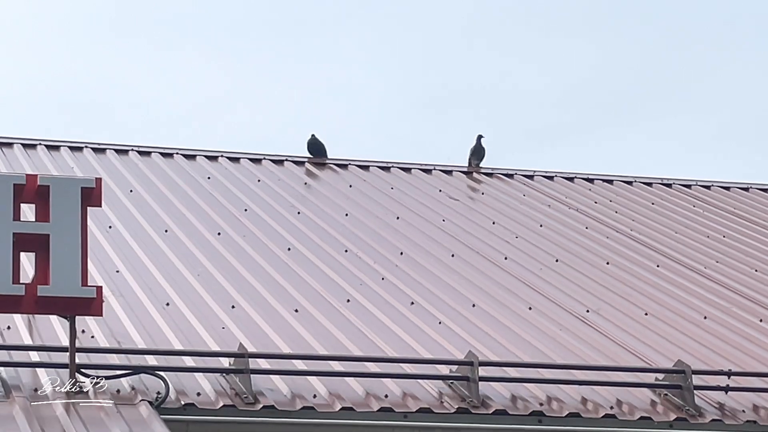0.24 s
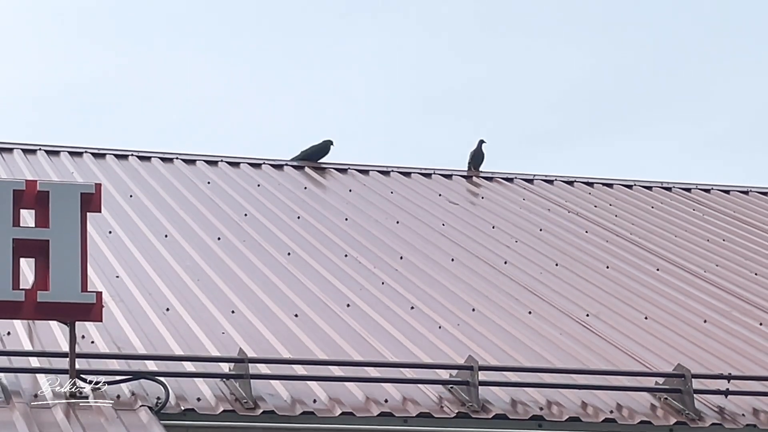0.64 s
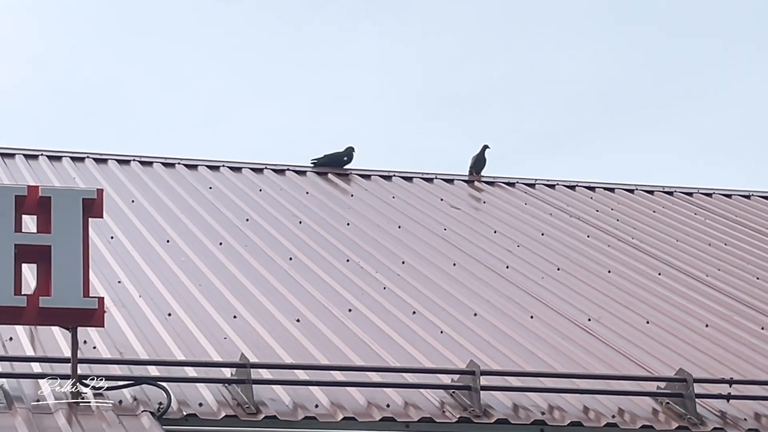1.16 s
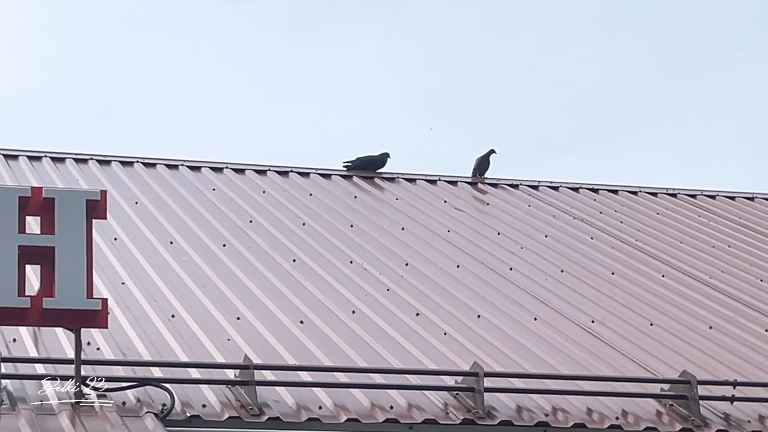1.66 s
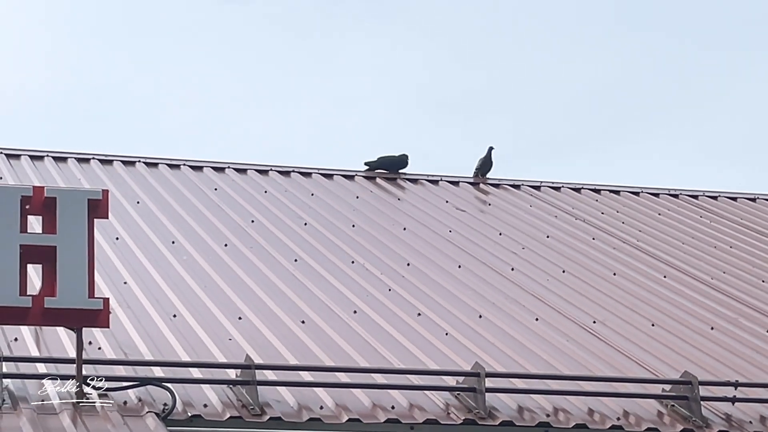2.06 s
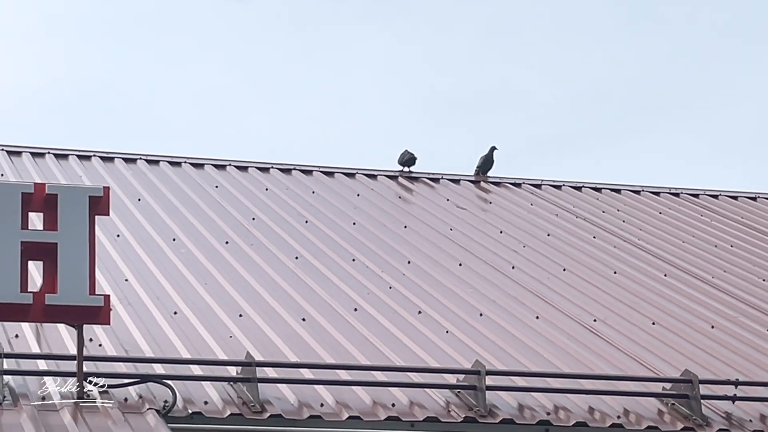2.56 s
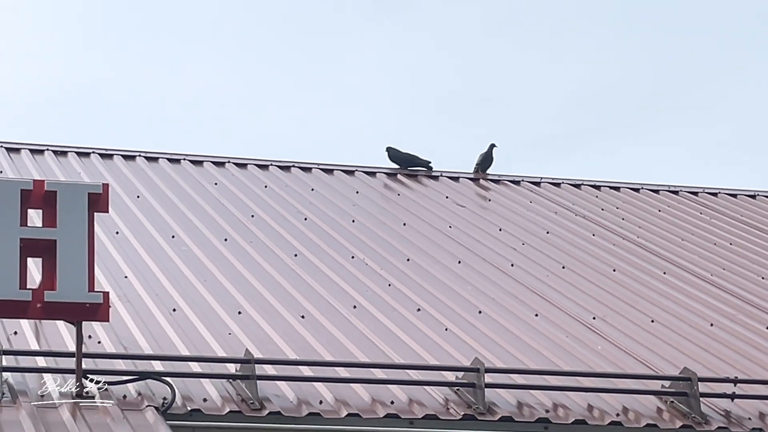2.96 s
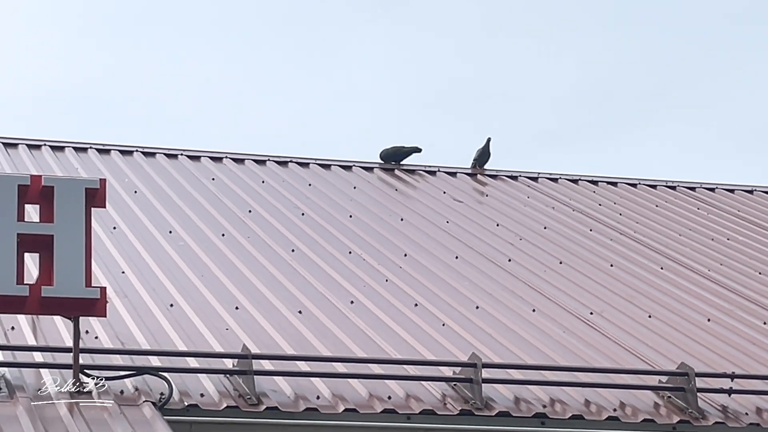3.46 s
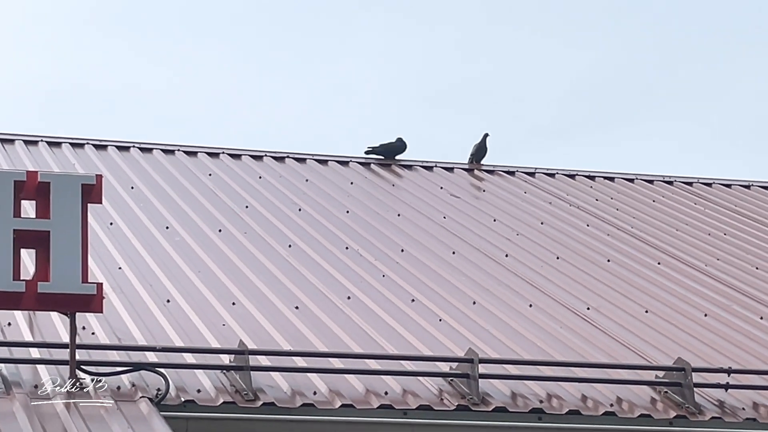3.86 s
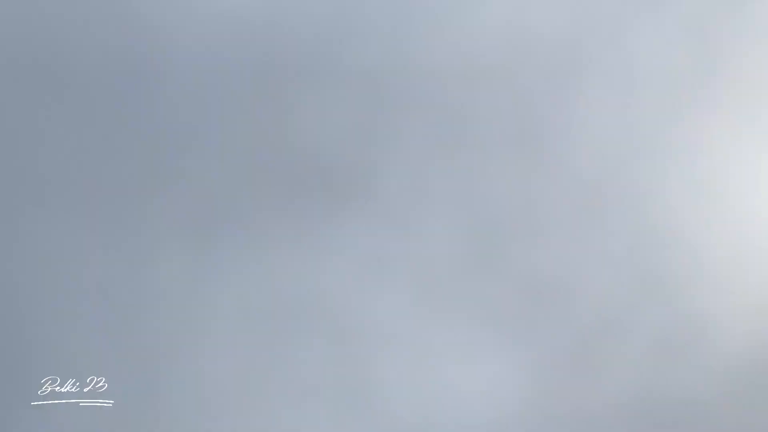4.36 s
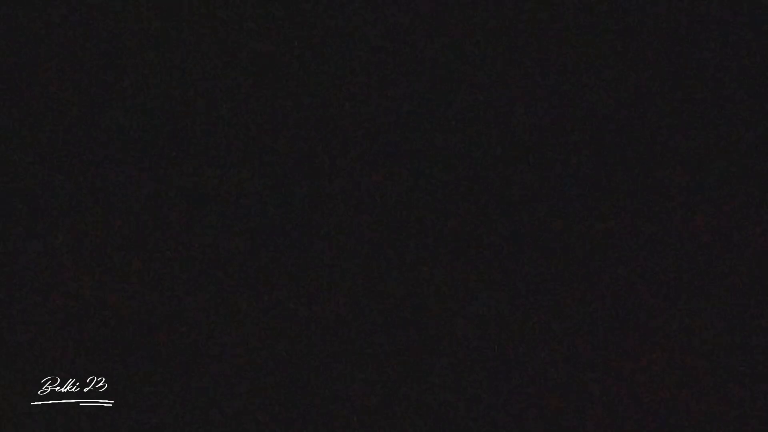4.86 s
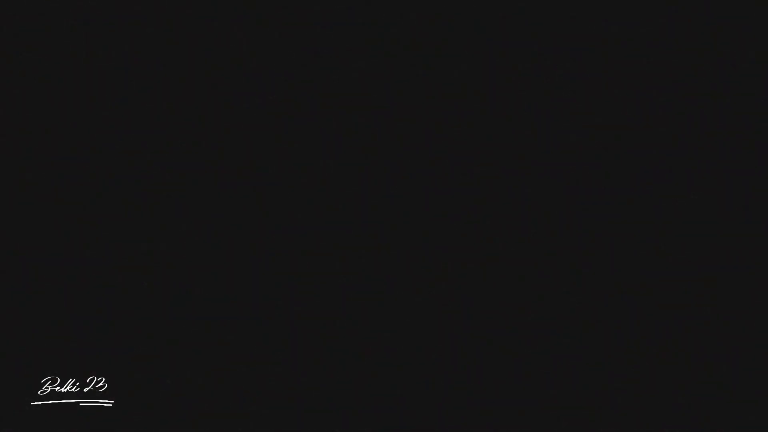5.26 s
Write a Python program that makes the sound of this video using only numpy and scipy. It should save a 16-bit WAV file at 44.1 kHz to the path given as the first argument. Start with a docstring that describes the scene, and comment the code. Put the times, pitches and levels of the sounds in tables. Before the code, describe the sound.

Outdoors, with low rumble and faint hiss, a pigeon on a metal roof gives three phrases of fast low clucks, each sinking into a coo and a thin husky moan. Light claw scratches tick along. After a tiny dropout near the end, a hand covers the microphone: very loud knocks, clicks, a scratchy squeak and rubbing, then duller, muffled handling.

```python
"""A courting pigeon on the ridge of a metal roof, a little left of the microphone: three phrases of soft
stuttered clucks, each ending in a coo and a thin moan, all gliding tones answered weakly by the yard.
Shaped noise gives its claws on the sheet, dry rasps and the quiet outdoor rumble and hiss; a far whistle is faint.
The sound drops out for a moment; then a hand closes over the camera, right at the microphone:
filtered blows make its knocks, friction noise its rubbing, and gliding husky tones its squeaks."""
import sys
import numpy as np
from scipy import signal
from scipy.fft import rfft, irfft, next_fast_len
from scipy.io import wavfile
from scipy.ndimage import map_coordinates

SR = 44100
rng = np.random.default_rng(int(sys.argv[2]) if len(sys.argv) > 2 else 0)


def wav_out(sig):
    """Save sig, one row per channel (or a flat mono array), as 16-bit PCM at SR to the path in sys.argv[1]."""
    wavfile.write(sys.argv[1], SR, np.round(np.clip(np.atleast_2d(sig).T, -1, 1) * 32767).astype(np.int16))


N = 243417
T = np.arange(N) / SR  # time of each sample [s]


def amp(db):
    """Decibels to gain."""
    return 10 ** (np.asarray(db) / 20)


def unit(x):
    """Scale to rms 1."""
    return x / np.sqrt(np.mean(x ** 2) + 1e-20)


def gain(points, hz):
    """Gain of (frequency [Hz], level [dB]) points joined on a log frequency axis."""
    f, db = np.transpose(points)
    return amp(np.interp(np.log(hz + 1), np.log(f), db))


def curves(rows):
    """One value per sample for each column after the time."""
    s, *columns = np.transpose(rows)
    return [np.interp(T, s, column) for column in columns]


def during(rows):
    """A soft-edged gate over the time that a table covers."""
    inside = np.minimum(T - rows[0][0], rows[-1][0] - T)
    return np.clip(inside / 0.0037, 0, 1)


def swells(rows):
    """Bell-shaped rises and falls of level."""
    return sum(amp(db) * np.exp(-((T - s) / half) ** 2) for s, half, db in rows)


def wobble(rate):
    """A smooth random curve, rate knots a second."""
    knots = rng.standard_normal(int(N * rate / SR) + 4)
    return map_coordinates(knots, [T * rate])


def filtered(x, response):
    """x times a complex response of frequency."""
    m = next_fast_len(N + SR // 2)
    return irfft(rfft(x, m) * response(np.fft.rfftfreq(m, 1 / SR)), m)[..., :N]


def noise(tone):
    """Coloured noise of rms 1."""
    return unit(filtered(rng.standard_normal(N), lambda hz: gain(tone, hz)))


def cycles(hz):
    """Running phase [rad] of a pitch curve."""
    return 2 * np.pi * np.cumsum(hz) / SR


def narrow(phase, width_hz):
    """A fuzzy line of rms about 1 around a running phase."""
    return wobble(width_hz) * np.sin(phase) + wobble(width_hz) * np.cos(phase)


def husky(hz, husk, husk_hz):
    """A gliding tone, part pitch and part rush."""
    phase = cycles(hz * (1 + .015 * wobble(40)))
    return np.sin(phase) + husk * narrow(phase, husk_hz)


# Stuttered notes before each coo: (time [s], level before trim [dB], pitch it sags towards [Hz])
CLUCK_NOTES = [(.062, -49.5, 308), (.12, -46, 341), (.183, -45.5, 330), (.243, -50.5, 291),
               (.368, -51.5, 430), (1.82, -59.5, 400), (1.955, -61, 400), (2.005, -55.5, 301),
               (2.062, -55, 334), (2.122, -57, 311), (2.185, -67, 448), (2.245, -60, 306),
               (2.285, -58.5, 318), (3.245, -54.5, 410), (3.38, -52.5, 303), (3.438, -50.5, 332),
               (3.5, -49, 341), (3.56, -50, 316), (3.633, -53, 383), (3.708, -51, 328)]


def clucks(length_s=0.021, fall=0.565, fall_s=0.0053, octave_db=-3.0, rough=0.57, trim_db=-1.2):
    """The syrinx starts each short, slightly hoarse puff high, and its pitch sags at once."""
    out, t = np.zeros(N), np.arange(int(length_s * SR)) / SR
    swell = np.abs(np.sin(np.pi * t / length_s)) ** 0.62
    shake = 1 + rough * wobble(350)
    for s, db, hz in CLUCK_NOTES:
        phase = cycles(hz * (1 + fall * np.exp(-t / fall_s)))
        octave = amp(octave_db + rng.normal(0, 1.2)) * np.sin(2 * phase)
        out[round(s * SR):][:len(t)] += amp(db) * swell * (np.sin(phase) + octave)
    return amp(trim_db) * out * shake


# Glide of each coo, one list per coo: (time [s], pitch [Hz], level before the crop [dB])
COO_GLIDES = [
    [(.408, 480, -53.5), (.44, 436, -53.5), (.46, 349.6, -52.5), (.53, 350, -49), (.556, 310, -52.5),
     (.585, 304, -58), (.615, 199, -69)],
    [(2.28, 355, -66), (2.32, 380, -61.5), (2.41, 335, -62), (2.46, 275, -64.5), (2.545, 224, -58),
     (2.59, 208, -67)],
    [(3.735, 315, -56), (3.78, 320, -53), (3.82, 342, -56.5), (3.89, 274, -61.5), (3.95, 250, -59.5),
     (3.972, 208, -59.5), (4, 154, -63.5)],
]
# How gravelly each coo is: (roughness at its start [0-1], at its end [0-1])
COO_ROUGHNESS = [(0.22, 0.034), (1, 0.46), (0.92, 0.37)]
# Under this pitch the octave takes over from the fundamental; the steepness is an exponent
OCTAVE_BELOW_HZ, OCTAVE_STEEPNESS = 281, 8.1


def coos(flutter_hz=260, jitter=0.00755):
    """A tone that clears of gravel as it goes; as it sinks, the crop's resonance favours the octave."""
    out = np.zeros(N)
    for rows, roughness in zip(COO_GLIDES, COO_ROUGHNESS):
        hz, db = curves(rows)
        rough = np.clip(np.interp(T, [rows[0][0], rows[-1][0]], roughness), 0, 1)
        octave = (OCTAVE_BELOW_HZ / hz) ** OCTAVE_STEEPNESS
        phase = cycles(hz * (1 + jitter * wobble(60)))
        level = during(rows) * amp(db)
        for k, share in enumerate([1, octave], 1):
            clean = np.sqrt(2 * (1 - rough ** 2)) * np.sin(k * phase)
            gravel = rough * narrow(k * phase, flutter_hz)
            out += level * share / np.hypot(1, octave) * (clean + gravel)
    return out


# Thin, husky moan after each coo, one list per moan: (time [s], pitch [Hz], level before trim [dB])
MOAN_GLIDES = [
    [(.64, 607, -72), (.7, 661, -66.5), (.8, 638, -72), (.9, 644, -78.5)],
    [(2.61, 540, -65), (2.66, 571, -63.5), (2.74, 650, -66), (2.82, 685, -67), (2.89, 690, -75)],
    [(4.02, 458, -73), (4.1, 539, -62), (4.16, 549, -63.5), (4.24, 600, -62.5), (4.28, 778, -59.5),
     (4.31, 870, -69)],
]


def moans(trim_db=-6.5):
    """The weak, mostly rising tone after each coo, more husk than pitch."""
    out = np.zeros(N)
    for rows in MOAN_GLIDES:
        hz, db = curves(rows)
        out += during(rows) * amp(db + trim_db) * husky(hz, husk=1.6, husk_hz=300)
    return out


# Resonance of the pigeon's inflated crop: (frequency [Hz], level [dB])
CROP_TONE = [(150, -23.5), (300, -2), (580, 1.5), (750, -19.5), (1100, -19)]


def pigeon_voice():
    """Clucks and coos sound through the inflated crop; the moans bypass it."""
    return filtered(clucks() + coos(), lambda hz: gain(CROP_TONE, hz)) + moans()


def yard(x, t60=0.97):
    """Nearby walls give a diffuse answer after 15 ms, different at each ear."""
    t = np.arange(SR) / SR
    tail = rng.standard_normal((2, len(t))) * amp(-60 * t / t60) * (t > .015)
    tail = tail / np.linalg.norm(tail[0])
    return signal.fftconvolve(x[None], tail, axes=1)[:, :N]


# Footfalls on the roof: (time [s], level before boost and attack [dB])
CLAW_STEPS = [(.0882, -64), (.5666, -64), (.8914, -67), (1.1842, -66), (1.4366, -61), (1.6771, -67),
              (1.8876, -63), (2.1241, -68), (2.3685, -61), (2.578, -66), (2.8315, -62.5), (3.0849, -58),
              (3.4874, -61), (3.675, -66), (3.919, -60.5)]
# Colour of claw on sheet metal: (frequency [Hz], level [dB])
CLAW_COLOUR = [(600, -30), (1500, -10), (4000, -1), (6500, 4), (11000, 2), (16000, -11)]


def claws(t60=.09, attack_s=0.0026, boost_db=5):
    """Each step is a short bright scratch on the sheet."""
    level = np.zeros(N)
    for s, db in CLAW_STEPS:
        t = np.maximum(T - s, 0)
        level += amp(db + boost_db - 60 * t / t60) * (1 - np.exp(-t / attack_s))
    return level * unit(noise(CLAW_COLOUR) * amp(3.4 * wobble(300)))


# Soft dry rasps: (middle [s], half length [s], level [dB])
RASP_SWELLS = [(1.365, 0.053, -59), (1.48, 0.055, -61), (4.14, 0.076, -60.5), (4.26, 0.062, -63)]
# Colour of the rasps: (frequency [Hz], level [dB])
RASP_COLOUR = [(1200, -31), (1800, -11), (2200, -0.5), (2600, -8.5), (3200, -15.5), (6000, -23),
               (12000, -33)]


def rasps(grain_db=1.5):
    """Swells of dry, grainy noise, perhaps the fanned tail brushing the ridge."""
    return swells(RASP_SWELLS) * unit(noise(RASP_COLOUR) * amp(grain_db * wobble(90)))


# Fingers on the camera body: (time [s], knock level [dB], knock pitch [Hz], click level [dB]),
# levels before the body's colour
FINGER_KNOCKS = [(4.3865, -6.5, 585, -10.5), (4.5214, -1.5, 395, -0.5), (4.5262, 6, 600, -9),
                 (4.5506, -8.5, 698, -46), (4.5748, -7.5, 530, -46), (4.6478, -25.5, 804, -60),
                 (4.6675, -16, 345, -50), (4.679, -13, 1570, -21.5), (4.7377, -6, 1186, -23),
                 (4.75, 1.5, 460, -16.5), (4.7731, 4, 770, -5.5), (4.7764, -5.5, 560, -9.5),
                 (4.8136, -17.5, 282, -56), (4.9267, -15.5, 620, -28), (4.9827, -21, 1000, -50),
                 (5.0168, -3, 520, -8), (5.0372, -19, 1808, -22), (5.2455, -16, 1380, -36),
                 (5.3942, -19.5, 1780, -36)]
# Shifts of the grip, soft flesh on the body: (time [s], thump level before the body's colour [dB],
# thump pitch [Hz])
GRIP_PUSHES = [(.265, -44, 60), (3.28, -32.5, 72.5), (3.4645, -36.5, 74), (3.561, -40, 73.6),
               (3.904, -39, 116), (4.2108, -35, 107), (4.388, -33, 80), (4.5255, -7.5, 149),
               (4.58, -18.5, 60.3), (4.671, -21, 90), (4.746, -22, 90), (4.9273, -18.5, 85),
               (5.001, -15, 221), (5.0166, -11.5, 80), (5.144, -20.5, 74), (5.1781, -18, 73.6),
               (5.2461, -21, 330), (5.4028, -28, 65)]


def knocks(click_hz=2500):
    """Each contact is one dead blow, as high as it is hard: fingers knock and click, flesh only thumps."""
    size, lead = 2 ** 14, 2 ** 11
    f = np.fft.rfftfreq(size, 1 / SR)
    out = np.zeros(N + 2 * size)
    thumps = [(*push, -np.inf) for push in GRIP_PUSHES]
    for s, db, hz, click_db in list(FINGER_KNOCKS) + thumps:
        u, w = f / hz, f / click_hz
        knock = amp(db) / hz * u / np.sqrt(1 + u ** 2) / (1 + u ** 4) ** (3 / 4)
        click = amp(click_db) / click_hz * w ** 2 / (1 + w ** 4)
        # the lead leaves room for the half of each pulse before its centre
        out[round(s * SR):][:size] += np.roll(irfft(knock + click) * SR / 2, lead)
    return out[lead:][:N]


# The camera body under a knock: (frequency [Hz], level [dB])
BODY_COLOUR = [(30, -4), (70, 0), (110, 0), (300, 0.5), (600, 0), (950, 1), (1300, -5), (1650, 0),
               (2200, 4.5), (3200, 2), (4600, -10), (6500, 2.5), (12000, 5), (16000, -10.5)]


def body_blows(lag_cycles=1.2, rattle_db=-13, rattle_t60=0.031):
    """Low frequencies arrive later, so each blow is a quick falling chirp; then the casing rattles."""
    def body(hz):
        return gain(BODY_COLOUR, hz) * np.exp(-2j * np.pi * lag_cycles * np.log(hz + 25))
    blows = filtered(knocks(), body)
    t = np.arange(SR // 20) / SR
    rattle = rng.standard_normal(len(t)) * amp(-60 * t / rattle_t60)
    rattle = rattle / np.linalg.norm(rattle)
    return blows + amp(rattle_db) * signal.fftconvolve(blows, rattle)[:N]


# Skin over the microphone port: (time [s], length [s], first level [dB], last level [dB],
# treble relative to the stroke [dB])
SKIN_STROKES = [(4.388, .058, -25, -28.5, .5), (4.451, .025, -33, -39, -3),
                (4.486, 0.015, -30.5, -20.5, -5), (4.5092, .011, -13, -10, -1.5),
                (4.541, 0.053, -51, -48.5, -19.5), (4.572, 0.0057, -29.5, -31, -13),
                (4.673, 0.0055, -37.5, -37.5, -18), (4.789, 0.056, -57, -43.5, -11.5),
                (4.862, 0.015, -42, -37, -5.5), (4.9, 0.11, -49.5, -47, -11.5),
                (5.021, .111, -39.5, -36.5, -2), (5.137, .025, -49, -52.5, -6),
                (5.178, 0.047, -41, -49.5, -7.5), (5.244, .2, -46.5, -48, -5.5),
                (5.449, 0.06, -58.5, -60.5, -5)]
SEAL_TIME = 4.535  # the palm closes over the port [s]
GRAB_S, RELEASE_S = 0.0073, .006  # how fast a stroke takes hold and lets go
REST_DB = -71  # faint rub of the resting palm


def strokes():
    """Each stroke takes hold, swells or eases evenly and lets go: its level and that of its treble."""
    power, treble = (amp(REST_DB) * (T > SEAL_TIME)) ** 2, np.zeros(N)
    for s, length, first_db, last_db, bright_db in SKIN_STROKES:
        outside = np.maximum(s - T, 0) / GRAB_S + np.maximum(T - s - length, 0) / RELEASE_S
        level = amp(np.interp(T, [s, s + length], [first_db, last_db]))
        stroke = level * np.exp(-np.minimum(outside, 10) ** 2)
        power = power + stroke ** 2
        treble = treble + (stroke * amp(bright_db)) ** 2
    return np.sqrt(power), np.sqrt(treble)


# Rub with the port still open: (frequency [Hz], level [dB])
OPEN_PORT_COLOUR = [(100, -20.5), (350, -5.5), (900, 5.5), (1300, -3), (1650, -9), (2100, -0.5), (3300, -1),
                    (4300, -5.5), (6500, -5), (9000, -7.5), (13000, -18), (16000, -26)]
# Rub with the port under the palm: (frequency [Hz], level [dB])
SEALED_PORT_COLOUR = [(100, -3.5), (450, 0), (800, -1.5), (1150, -1.5), (1550, -2), (2200, 1), (3200, -8.5),
                      (4700, -11), (6500, -6.5), (10000, -8.5), (13000, -22), (16000, -30)]


def rubbing(level, treble, grain_db=2, slip_db=1, split_hz=3600, catch_rate=900, catch_db=-3):
    """Skin slides over the port and catches in tiny jerks; the colour changes once the palm seals it."""
    catches = (rng.random(N) < catch_rate / SR) * rng.standard_normal(N)
    friction = rng.standard_normal(N) + amp(catch_db) * unit(catches)
    bare = unit(filtered(friction, lambda hz: gain(OPEN_PORT_COLOUR, hz)))
    sealed = unit(filtered(friction, lambda hz: gain(SEALED_PORT_COLOUR, hz)))
    unevenness = amp(grain_db * wobble(900) + slip_db * wobble(150))
    grains = unit(np.where(T < SEAL_TIME, bare, sealed) * unevenness)
    dull = filtered(grains, lambda hz: 1 / (1 + (hz / split_hz) ** 12))
    return level * dull + treble * (grains - dull)


# Low rumble of the held body: (frequency [Hz], level [dB])
GRIP_COLOUR = [(15, -37), (40, -6), (70, 2), (115, 1.5), (170, -6.5), (260, -11.5), (600, -26),
               (2000, -57.5)]
# Shudder left by each push: level against its thump [dB], rise [s], 60 dB decay [s]
SHUDDER_DB, SHUDDER_RISE_S, SHUDDER_T60 = -15.5, 0.011, 0.21
DRAG_DB, HOLD_DB = -7.5, -56.5  # rumble of a stroke against its rub; rumble of the resting hand


def grip(rub, most_drag_db=-43, body_hz=85):
    """The body rumbles under the resting hand and dragging skin, and shudders most after deep pushes."""
    power = (amp(HOLD_DB) * (T > SEAL_TIME)) ** 2
    power += np.minimum(amp(DRAG_DB) * rub, amp(most_drag_db)) ** 2
    for s, db, hz in GRIP_PUSHES:
        t = np.clip(T - s, 0, 1)
        decay = amp(db + SHUDDER_DB - 60 * t / SHUDDER_T60)
        depth = min(body_hz / hz, 1) ** 2
        power += (decay * depth * (1 - np.exp(-t / SHUDDER_RISE_S))) ** 2
    return np.sqrt(power) * noise(GRIP_COLOUR)


# Stereo width of the handling: (frequency [Hz], side over mid [dB])
HAND_SPREAD = [(60, -22), (200, -12), (700, -13), (1150, -13), (1600, -4), (2200, -11), (4400, -23.5),
               (6200, -8), (8000, 7.5), (12000, -4.5)]


def hand():
    """Blows, rubbing and grip right at the microphone, whose two ports pick them up out of step."""
    rub, treble = strokes()
    mid = body_blows() + rubbing(rub, treble) + grip(rub)
    side = filtered(mid, lambda hz: 1j * gain(HAND_SPREAD, hz))
    return np.array([mid + side, mid - side])


# A thin high tone as the second moan ends, then skin catching on the body: (time [s], length [s], first pitch
# [Hz], # last pitch [Hz], level before trim [dB])
SQUEAK_GLIDES = [(2.82, .085, 1190, 1390, -66.5), (4.389, 0.0084, 3450, 3280, -18),
                 (4.504, 0.029, 2332, 2260, -11.5), (4.572, .014, 700, 600, -20.5),
                 (4.872, 0.014, 2930, 2910, -40), (5.02, .08, 580, 292, -35.5),
                 (5.318, 0.023, 720, 636, -44)]


def squeaks(trim_db=-6):
    """Brief, scratchy squeaks: each swells and fades over one straight glide."""
    out = np.zeros(N)
    for s, length, first_hz, last_hz, db in SQUEAK_GLIDES:
        u = np.clip((T - s) / length, 0, 1)
        hz = first_hz + (last_hz - first_hz) * u
        out += amp(db + trim_db) * np.sin(np.pi * u) * husky(hz, husk=1.9, husk_hz=265.4)
    return out


# A faint far whistle: (middle [s], half length [s], level [dB])
WHISTLE_SWELLS = [(.98, .16, -77), (2.28, .18, -75.5), (4.02, 0.077, -71)]


def whistles(pitch_hz=4370, width_hz=90):
    """A thin, far whistle, a fuzzy line at one pitch, swells and fades."""
    return swells(WHISTLE_SWELLS) * narrow(2 * np.pi * pitch_hz * T, width_hz)


# Outdoor rumble over time: (time [s], level before trim [dB])
RUMBLE_LEVEL = [(0.0, -67.5), (1.93, -65.5), (2.56, -66.5), (3.16, -57.5), (3.38, -60.5), (4.0, -58.5),
                (4.3, -59)]
# Colour of the rumble: (frequency [Hz], level [dB])
RUMBLE_COLOUR = [(20, -25), (35, -9), (55, 0.5), (95, 2), (140, -10), (200, -6.5), (300, -16.5), (700, -36)]
# Colour of the far hiss: (frequency [Hz], level [dB])
HISS_COLOUR = [(60, 0.5), (250, 7.5), (650, 5), (1000, 2), (1600, -1.5), (2300, 2.5), (3200, 1), (4500, 0),
               (6500, -5), (8000, -8), (10500, -7.5), (13000, -30), (16000, -22)]
# Stereo width of the open air: (frequency [Hz], side over mid [dB])
AIR_SPREAD = [(60, -13), (200, -9.5), (400, -4.5), (700, -0.5), (1300, -1), (2400, -5), (4400, -33.5),
              (6500, -5.5), (8000, 11), (15000, -27)]
# The palm shuts out the yard, by varying amounts: (time [s], level [dB])
PALM_COVER = [(4.53, -0.5), (4.6, -26), (4.75, -11.5), (4.85, -4), (5.52, -12)]


def background(rumble_trim_db=1.5, hiss_db=-64.0):
    """Restless low rumble and an even far hiss, both turned down under the palm."""
    low = amp(curves(RUMBLE_LEVEL)[0] + rumble_trim_db + 2.1 * wobble(15))
    high = amp(hiss_db)
    mid, side = [low * noise(RUMBLE_COLOUR) + high * noise(HISS_COLOUR) for _ in range(2)]
    side = filtered(side, lambda hz: gain(AIR_SPREAD, hz))
    return amp(curves(PALM_COVER)[0]) * np.array([mid + side, mid - side])


def scene(wet_db=-10.0, left_db=1.2):
    """The pigeon a little left of centre, its voice carried round the yard; the hand at the microphone."""
    voice = pigeon_voice()
    bird = (voice + claws() + rasps()) * amp([[left_db], [-left_db]])
    answer = amp(wet_db) * yard(voice)
    return bird + answer + whistles() + background() + squeaks() + hand()


# Microphone colour: (frequency [Hz], level [dB])
MIC_COLOUR = [(6500, 0.5), (7100, -11.5), (12000, -7), (13500, -9.5), (14300, -32), (16000, -35)]
# The silent moment: (start [s], end [s])
SILENT_MOMENT = (4.326, 4.374)
TOP_HZ = 16200  # nothing passes above this


def record(dry):
    """Microphone colour, a brief dropout, soft overload and the band limit."""
    x = filtered(dry, lambda hz: gain(MIC_COLOUR, hz))
    outside = np.maximum(SILENT_MOMENT[0] - T, T - SILENT_MOMENT[1])
    x = x * np.clip(outside / .002, 0, 1)  # 2 ms edges
    x = x / (1 + np.abs(x / .93) ** 8) ** (1 / 8)  # levels off towards 0.93
    return filtered(x, lambda hz: hz < TOP_HZ)


dry = scene()
out = record(dry)
wav_out(out)
```